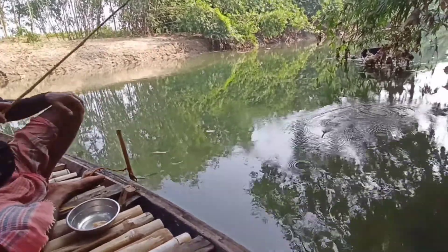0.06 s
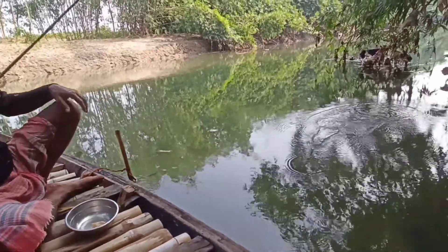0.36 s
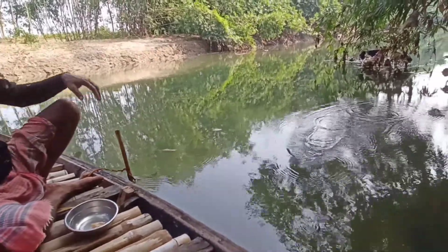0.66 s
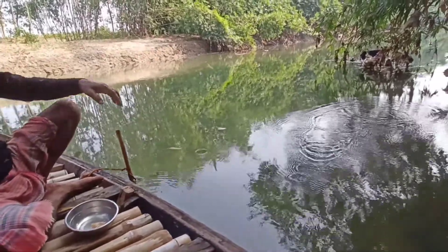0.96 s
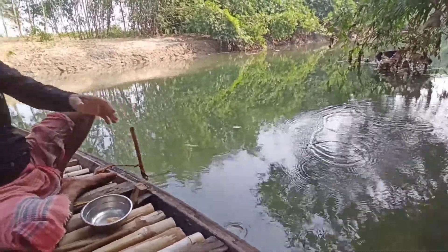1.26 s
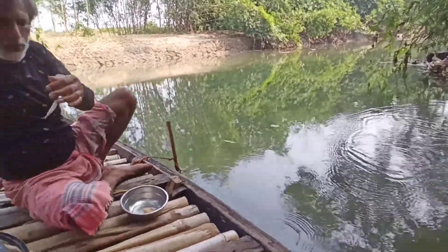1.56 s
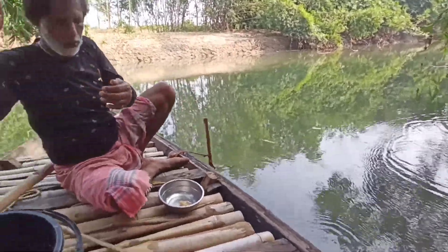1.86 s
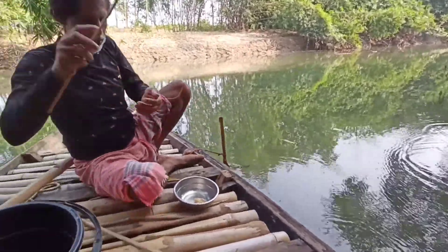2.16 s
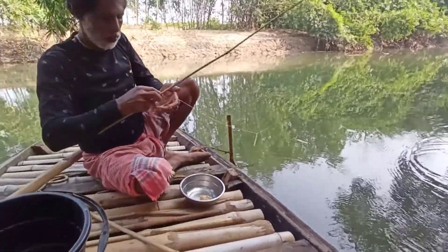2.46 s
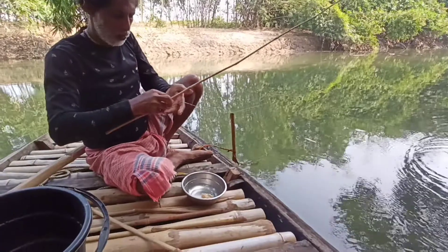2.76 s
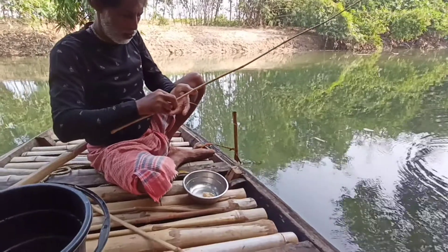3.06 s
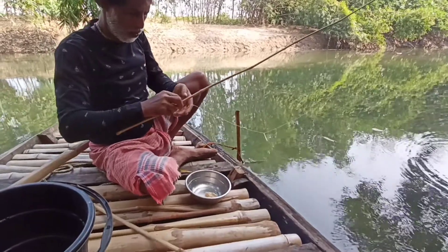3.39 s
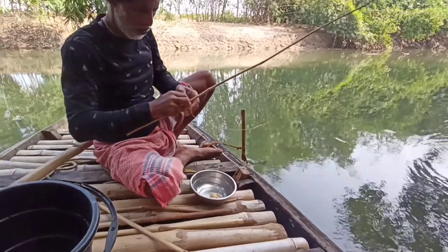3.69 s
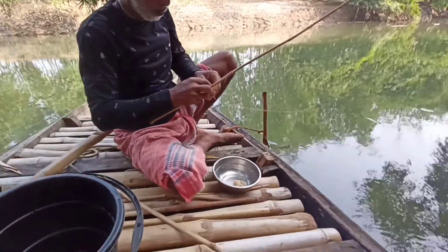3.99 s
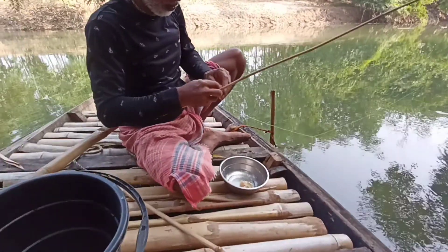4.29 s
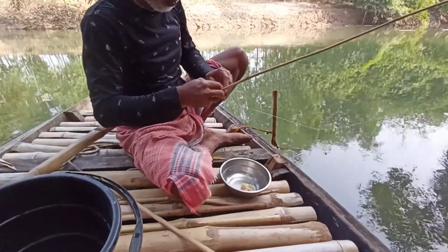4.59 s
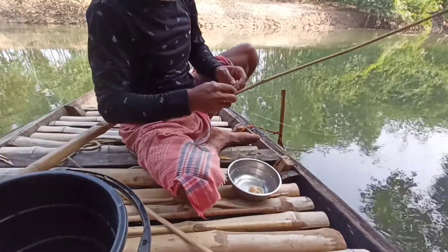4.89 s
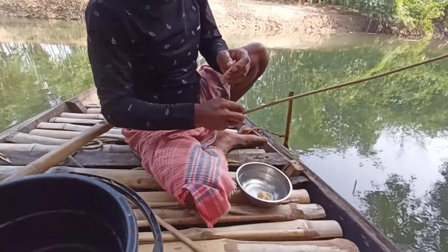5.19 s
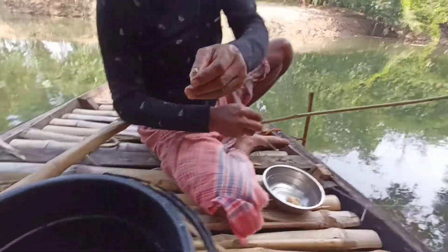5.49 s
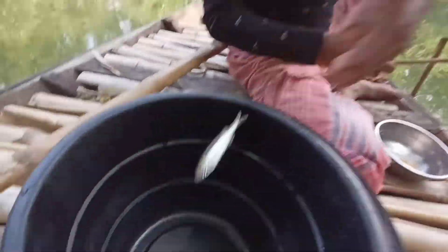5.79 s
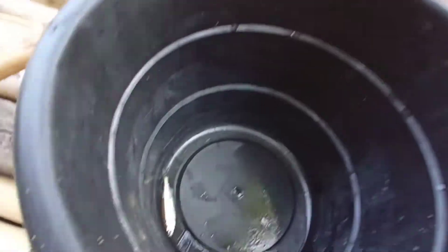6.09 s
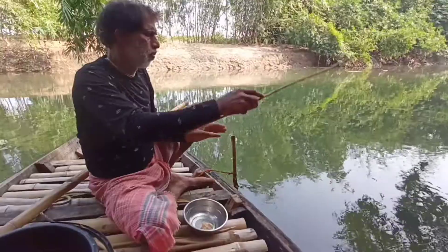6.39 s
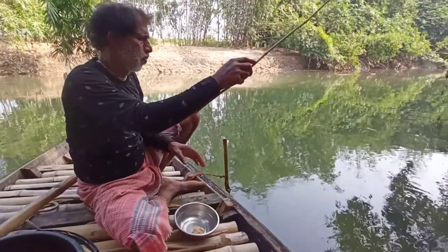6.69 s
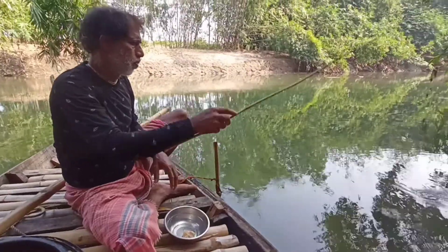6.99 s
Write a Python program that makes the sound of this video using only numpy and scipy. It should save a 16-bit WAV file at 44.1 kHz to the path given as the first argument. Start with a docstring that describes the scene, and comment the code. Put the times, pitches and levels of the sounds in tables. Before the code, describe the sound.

Faint birds chirp by a quiet river; a soft plop, then a small fish thuds and splashes into a plastic bucket.

```python
"""Faint open-air hiss and a low drone lie over a quiet river bank, heard from a bamboo-decked boat.
Small birds chip and whistle and a rooster crows far off: gliding tones that the wooded banks echo.
A small fish is pulled out with a soft plop of resonating bubbles; sleeves rustle by friction and
tackle ticks while it is unhooked. It is tossed into a nearby plastic bucket with a little water and
flaps there: each impact excites the bucket's damped modes, and drops patter down afterwards."""
import sys
import numpy as np
from scipy import signal
from scipy.fft import rfft, irfft
from scipy.io import wavfile

SR = 44100
rng = np.random.default_rng(int(sys.argv[2]) if len(sys.argv) > 2 else 0)


def unload_audio(sound):
    """Save the sound as a 16-bit wav file, at the path given as the first command line argument."""
    columns = np.transpose(np.atleast_2d(sound))
    # keep every value between -1 and 1, then stretch to whole-number steps
    steps = np.round(np.clip(columns, -1, 1) * 32767)
    wavfile.write(sys.argv[1], SR, steps.astype(np.int16))


N = 319705
TIME = np.arange(N) / SR


def gain_of(db):
    """Amplitude ratio of a level in decibels."""
    return 10 ** (np.asarray(db) / 20)


def unit_rms(x):
    """Normalisation to unit power."""
    return x / np.sqrt(np.mean(x ** 2) + 1e-20)


def value_at(points, hz):
    """Interpolation on a logarithmic frequency axis."""
    f, value = np.transpose(points)
    return np.interp(np.log(hz + 1), np.log(f + 1), value)


def add(mix, s, sound):
    """Superposition: a sound joins the mix at s seconds."""
    part = mix[max(round(s * SR), 0):][:len(sound)]
    part += sound[:len(part)]


def progress(length):
    """Normalised time, 0 to 1 over a length in seconds."""
    return np.arange(0, 1, 1 / (length * SR))


def coloured(x, points, size=4096):
    """Spectral shaping by a minimum-phase filter of unit energy."""
    db = value_at(points, abs(np.fft.fftfreq(size, 1 / SR)))
    log_gain = np.log(gain_of(np.maximum(db, -100)))
    response = np.exp(np.conj(signal.hilbert(log_gain)))
    taps = np.fft.ifft(response).real[:size // 2]
    return signal.oaconvolve(x, taps / np.linalg.norm(taps))[:len(x)]


def wander(rate_hz, size=N):
    """Random fluctuation of unit power: noise rolled off above the given rate."""
    lowpass = np.exp(-(np.fft.rfftfreq(size, 1 / SR) / rate_hz) ** 2)
    return unit_rms(irfft(rfft(rng.standard_normal(size)) * lowpass, size))


def grainy(spread_db, rate_hz):
    """Random amplitude modulation gathers noise into clumps."""
    return unit_rms(rng.standard_normal(N) * gain_of(spread_db * np.clip(wander(rate_hz), -2, 2)))


def surges(rows):
    """Envelopes of linear rise and exponential decay add in power, as incoherent sources do."""
    power, t = np.zeros(N), TIME[:SR]
    for s, db, rise, decay in rows:
        envelope = gain_of(db) * np.minimum(t / rise, 1) * np.exp(-np.maximum(t - rise, 0) / decay)
        add(power, s, envelope ** 2)
    return np.sqrt(power)


def sung(hz, rasp, rasp_hz, attack, release, shimmer_db, overtone_db=-40):
    """A tone with random frequency and amplitude modulation; attack and release are shares of it."""
    u = np.linspace(0, 1, len(hz))
    pitch = hz * (1 + rasp * wander(rasp_hz, size=SR)[:len(u)])
    phase = 2 * np.pi * np.cumsum(pitch) / SR
    ramp = np.clip(np.minimum(u / attack, (1 - u) / release), 0, 1)
    swell = np.sin(np.pi / 2 * ramp) ** 2
    shimmer = gain_of(shimmer_db * wander(21, size=SR)[:len(u)])
    overtones = gain_of(overtone_db) * (np.sin(2 * phase) + np.sin(3 * phase))
    return swell * shimmer * (np.sin(phase) + overtones)


def chip(top_hz, length, sweep, droop):
    """A parabolic frequency sweep shoots up to its top at halfway, then droops."""
    u = progress(length)
    arch = 1 - np.where(u < .5, sweep, droop) * (2 * u - 1) ** 2
    hz = top_hz * arch * (1 + 0.0057 * rng.standard_normal())
    return np.sin(np.pi * u) ** 0.23 * np.sin(2 * np.pi * np.cumsum(hz) / SR)


# Spectra of the hiss and the drone. Each row: frequency in Hz, relative level in dB.
HISS_SPECTRUM = [(25, -34), (43, -25), (190, 3), (344, -15.5), (695, -12), (936, -20.5), (1790, -19),
                 (2410, -24), (4870, -20.5), (6380, -25.5), (7510, -19), (10100, -34), (14800, -29),
                 (16000, -31)]
DRONE_SPECTRUM = [(25, -56), (55, -7), (110, -9), (150, -8), (182, 0.5), (225, -7), (300, -13), (500, -27),
                  (1200, -49)]

def air():
    """Ambient noise: a broadband hiss over a distant low drone whose level fluctuates."""
    hiss = gain_of(-66) * coloured(rng.standard_normal(N), HISS_SPECTRUM) * gain_of(0.087 * wander(15))
    drone = gain_of(-65) * coloured(rng.standard_normal(N), DRONE_SPECTRUM) * gain_of(wander(17))
    return hiss + drone


# Reverberation of the wooded banks. Each row: frequency in Hz, time to fall 60 dB (T60) in seconds.
BANK_DECAY = [(150, 1), (600, 0.85), (2500, 0.5), (5000, 1), (14000, 0.68)]

def bank_echo(x, build_s, treble_db):
    """Scattering from leaves and banks gives many reflections, each band decaying at its own rate."""
    reflections = rng.standard_normal(SR) * (rng.random(SR) < .06)
    reflections *= np.minimum(TIME[:SR] / build_s, 1) ** 2
    hz, t, bands = signal.stft(reflections, SR, nperseg=256)
    decay_db = -60 * t / value_at(BANK_DECAY, hz)[:, None]
    tilt_db = value_at([(300, 0), (4000, treble_db)], hz)[:, None]
    tail = signal.istft(bands * gain_of(decay_db + tilt_db), SR, nperseg=256)[1]
    return signal.oaconvolve(x, tail / np.linalg.norm(tail))[:N]


# Syllables of crowing. Each row: start and length in seconds, first, top and last pitch in Hz,
# place of the top from 0 to 1, level in dB, hoarseness as a share of pitch.
CROW_SYLLABLES = [(2.556, 0.61, 607, 734, 609, 0.23, -69.5, 0.041),
                  (3.443, 0.66, 604, 755, 597, 0.15, -70.5, 0.029),
                  (4.632, 0.13, 637, 812, 690, 0.8, -68, 0.013),
                  (4.874, 0.11, 655, 807, 667, .55, -69, 0.019),
                  (5.181, .48, 797, 845, 634, 0.3, -67.5, 0.0068),
                  (6.306, 0.081, 700, 780, 747, 0.57, -58.5, 0.042)]

def rooster():
    """Frequency jitter makes a hoarse voice; each syllable climbs, then sinks and weakens."""
    out = np.zeros(N)
    for s, length, start_hz, top_hz, end_hz, top, db, hoarse in CROW_SYLLABLES:
        u = progress(length)
        before, after = np.maximum(1 - u / top, 0), np.maximum((u - top) / (1 - top), 0)
        pitch = top_hz + (start_hz - top_hz) * before ** 2 + (end_hz - top_hz) * after ** 1.1
        voice = sung(pitch, hoarse, 90, attack=0.028, release=0.022, shimmer_db=1.2, overtone_db=-30)
        fade_db = -1.5 * np.maximum(u - top, 0)
        add(out, s, gain_of(db + fade_db) * voice)
    return out


# Assorted short bird notes, including high lead-ins to two "tsee" calls. Each row: start and length
# in seconds, first and last pitch in Hz, level in dB, rasp as a share of pitch.
SHORT_NOTES = [(0.0, 0.25, 611, 584, -73, 0.012), (1.378, 0.16, 5650, 5790, -71, 0.06),
               (2.328, 0.053, 2090, 2210, -69.5, 0.037), (3.585, 0.19, 4640, 4500, -68.5, 0.075),
               (3.865, 0.087, 505, 491, -67.5, .006), (4.067, 0.18, 8070, 7900, -69.5, 0.0065),
               (6.565, .035, 2000, 1990, -66, .012), (5.769, 0.073, 1750, 1716, -67, 0.016),
               (6.695, 0.056, 5900, 7750, -63, 0.14)]

def short_bird_notes():
    """Single notes, each a linear frequency glide."""
    out = np.zeros(N)
    for s, length, start_hz, end_hz, db, rasp in SHORT_NOTES:
        pitch = start_hz + (end_hz - start_hz) * progress(length)
        note = sung(pitch, rasp, rasp_hz=293, attack=0.15, release=0.18, shimmer_db=2.5)
        add(out, s, gain_of(db) * note)
    return out


# Long thin whistles. Each row: start and length in seconds, top pitch in Hz, level in dB,
# place of the top from 0 to 1.
THIN_WHISTLES = [(2.075, 0.39, 5310, -61, 0.77), (3.983, 0.54, 5365, -67, 0.52),
                 (5.84, 0.26, 5320, -66, 0.7), (7.116, 0.24, 5300, -63.5, 0.7)]

def thin_whistler():
    """Amplitude modulation flutters a fading tone whose pitch follows a shallow arch."""
    out = np.zeros(N)
    for s, length, top_hz, db, top in THIN_WHISTLES:
        u = progress(length)
        flutter_db = 2.5 * np.clip(wander(rate_hz=34.7, size=SR)[:len(u)], -2, 1)
        pitch = top_hz * (1 - 0.18 * (u - top) ** 2)
        note = sung(pitch, rasp=0.014, rasp_hz=150, attack=0.085, release=0.16, shimmer_db=1.9)
        add(out, s, gain_of(db - 9 * u + flutter_db) * note)
    return out


# Lower whistles, one contour a call. Each point: time in seconds, pitch in Hz, level in dB.
FLICK_CALLS = [
    [(4.262, 2210, -76), (4.3, 2480, -65), (4.345, 2450, -68), (4.372, 2506, -55), (4.395, 2500, -61),
     (4.418, 2498, -67), (4.432, 2100, -68)],
    [(4.635, 2410, -78), (4.675, 2480, -61.5), (4.717, 2518, -56), (4.729, 2526, -66), (4.737, 2550, -59),
     (4.762, 2540, -74), (4.776, 2530, -52), (4.787, 2120, -69)],
]

def flick_whistler():
    """A harmonic tone scoops up and swells; deep frequency jitter roughens its closing flick."""
    out = np.zeros(N)
    flick_s, flick_hz, flick_db = 0.029, 2710, -57
    for call in FLICK_CALLS:
        s, hz, db = np.transpose(call)
        t = np.arange(s[0], s[-1], 1 / SR)
        note = sung(np.interp(t, s, hz), rasp=0.0064, rasp_hz=250, attack=0.035, release=0.03,
                    shimmer_db=0.5, overtone_db=-13.5)
        add(out, s[0], gain_of(np.interp(t, s, db)) * note)
        fall = flick_hz * (1 - 0.154 * progress(flick_s))
        flick = sung(fall, rasp=0.16, rasp_hz=604, attack=0.14, release=0.64, shimmer_db=2)
        add(out, s[-1] - flick_s / 4, gain_of(flick_db) * flick)
    return out


# Very high "tsee" calls. Each row: start and length in seconds, held pitch in Hz, level in dB,
# rasp as a share of pitch.
TSEES = [(1.019, 0.059, 6860, -62, 0.041), (3.05, 0.063, 6970, -62.5, 0.011),
         (3.264, 0.093, 6750, -61, 0.0057), (4.203, 0.078, 7170, -60, 0.029),
         (6.74, 0.063, 7070, -59, 0.029), (7.138, 0.07, 7170, -61.5, .04)]

def tsee_bird(settle_s=0.019):
    """Exponential relaxation: the pitch drops onto a note and holds it."""
    out = np.zeros(N)
    for s, length, hz, db, rasp in TSEES:
        pitch = hz * (1 + 0.14 * np.exp(-length * progress(length) / settle_s))
        note = sung(pitch, rasp, rasp_hz=466, attack=0.28, release=0.14, shimmer_db=2.5)
        add(out, s, gain_of(db) * note)
    return out


# Two-part calls. Each row: start in seconds, level of the hook in dB, level of the slur in dB.
HOOK_CALLS = [(1.346, -68, -68), (2.03, -52.5, -70), (2.574, -58.5, -72), (3.284, -60, -69),
              (3.833, -60, -71), (4.582, -65, -74), (5.1798, -67, -63.5), (5.808, -64, -79),
              (6.34, -56.5, -67)]

def hook_bird(slur_hz=3300, slur_after_s=0.07):
    """Two frequency sweeps in turn: a steep rising hook, then a soft falling slur."""
    out = np.zeros(N)
    for s, db, slur_db in HOOK_CALLS:
        add(out, s, gain_of(db) * chip(top_hz=4710, length=0.0283, sweep=0.347, droop=0.036))
        fall = slur_hz * (1 - 0.185 * progress(length=0.04))
        slur = sung(fall, rasp=0.015, rasp_hz=280, attack=0.35, release=0.45, shimmer_db=1)
        add(out, s + slur_after_s, gain_of(slur_db) * slur)
    return out


# Chips, about two a second. Each row: start in seconds, direct level in dB, echo level in dB.
CHIPS = [(0.4414, -73, -72), (0.8374, -71, -80), (1.2, -69, -79), (1.3478, -65, -66),
         (2.1804, -64.5, -62.5), (2.6204, -65, -58.5), (3.0574, -62.5, -62), (3.4864, -58.5, -62),
         (3.8674, -61, -70), (4.2434, -60, -64), (4.3874, -60, -67), (4.7854, -61, -70),
         (5.3784, -62.5, -70), (6.5314, -67, -67), (6.9014, -69, -71)]

def chipping_bird():
    """Each upward sweep takes two paths: straight to the listener, and into the trees."""
    direct, to_trees = np.zeros((2, N))
    for s, db, echo_db in CHIPS:
        call = chip(top_hz=3506, length=0.0206, sweep=0.259, droop=0.068)
        add(direct, s, gain_of(db) * call)
        add(to_trees, s, gain_of(echo_db) * call)
    return direct, to_trees


def birds():
    """Direct and reverberant sound add, in a different ratio for each kind of call."""
    direct, to_trees = chipping_bird()
    hooks = hook_bird()
    whistles = thin_whistler() + flick_whistler() + short_bird_notes()
    for voice, echo_db in (hooks, -8.5), (whistles, -4.5), (tsee_bird(), -4), (rooster(), -7):
        direct += voice
        to_trees += gain_of(echo_db) * voice
    return direct + bank_echo(to_trees, build_s=0.01, treble_db=1)


# Strokes of cloth. Each row: centre and half-width in seconds, level in dB.
RUSTLES = [(1.822, 0.015, -67.5), (2.057, 0.049, -61.5), (2.33, 0.16, -66.5), (3.2, 0.089, -67),
           (3.844, 0.066, -65.5), (5.123, 0.93, -69.5), (6.026, 0.13, -58), (6.336, 0.15, -61.5),
           (7.052, 0.3, -67)]
# Spectrum of rubbing cloth. Each row: frequency in Hz, relative level in dB.
CLOTH_SPECTRUM = [(200, 5.5), (700, 6), (1500, -5.5), (2500, 0.5), (4800, 3.5), (6200, 1.5), (7700, 2.5),
                  (10000, -8), (14500, -5.5), (16000, -11)]

def sleeves():
    """Friction of cloth makes crackly noise that swells and fades with each stroke."""
    power = sum(gain_of(db) ** 2 * np.exp(-((TIME - s) / half) ** 2) for s, half, db in RUSTLES)
    return np.sqrt(power) * coloured(grainy(spread_db=2.5, rate_hz=120), CLOTH_SPECTRUM)


# Ticks of the tackle and knocks of the rod. Each row: start in seconds, relative level in dB.
TICKS = [(1.435, -44.5), (1.443, -51.5), (1.823, -48.5), (2.315, -52), (3.046, -48), (5.591, -53.5),
         (5.901, -46), (6.989, -50)]
KNOCKS = [(3.171, -52), (4.528, -49), (4.801, -49), (5.121, -50.5), (7.035, -51)]
# Their spectra. Each row: frequency in Hz, relative level in dB.
TICK_SPECTRUM = [(500, -4), (3000, -13), (5500, 3), (7800, 4), (10500, -6.5), (14500, 9), (16000, -6)]
KNOCK_SPECTRUM = [(150, -24), (400, -2), (720, 2), (1100, -1), (1800, -3), (3500, -11), (8000, -34),
                  (16000, -46)]

def tackle():
    """Small impacts radiate noise bursts: bright from line and hook, duller from the handled rod."""
    ticks = surges([(s, db - 0.5, .0003, .0012) for s, db in TICKS]) * rng.standard_normal(N)
    knocks = surges([(s, db - 10.5, .002, .008) for s, db in KNOCKS]) * rng.standard_normal(N)
    faint_ticks = (rng.random(N) < 7 / SR) * gain_of(-52 + 3.4 * rng.standard_normal(N))
    return coloured(ticks + faint_ticks, TICK_SPECTRUM) + coloured(knocks, KNOCK_SPECTRUM)


# Gulps of river water. Each row: start in seconds, level in dB, rise and decay in seconds.
GULPS = [(1.80, -55.5, 0.0024, 0.029), (1.91, -56, 0.011, 0.15), (1.972, -41.5, 0.016, 0.044),
         (2.16, -57, 0.009, 0.065)]
# Their spectrum. Each row: frequency in Hz, relative level in dB.
GULP_SPECTRUM = [(40, -50), (110, 2.5), (230, 3.5), (420, -8.5), (750, -12), (950, -25), (1250, -19),
                 (2200, -32), (6000, -44)]

def river_gulps():
    """Water displaced as the fish comes out gives surges of low-frequency noise."""
    return coloured(surges(GULPS) * grainy(spread_db=1.5, rate_hz=140), GULP_SPECTRUM)


# Air pockets in river and bucket. Each row: start in seconds, pitch in Hz, level in dB, T60 in seconds.
BUBBLES = [(1.9961, 245, -29.5, 0.05), (1.999, 454.6, -43, 0.17), (2.013, 189.7, -41.5, 0.27),
           (6.052, 1455, -23, 0.047), (6.089, 378, -15.5, 0.07), (6.096, 618, -29.5, 0.091),
           (6.072, 940, -24, 0.038), (6.113, 1047, -36, 0.067), (6.1776, 1373, -30.5, 0.026),
           (6.221, 3000, -47, 0.021), (6.2474, 3230, -45, 0.018)]

def bubbles(rise_per_t60=0.1):
    """Trapped air rings as a damped oscillator whose pitch rises as it dies."""
    out, t = np.zeros(N), TIME[:SR // 2]
    for s, hz, db, t60 in BUBBLES:
        cycles = hz * (t + rise_per_t60 * t ** 2 / (2 * t60))
        envelope = gain_of(db - 60 * t / t60) * (1 - np.exp(-2 * cycles))
        add(out, s, envelope * np.sin(2 * np.pi * cycles))
    return out


# Modes of plastic and enclosed air. Each row: frequency in Hz, relative level in dB, T60 in seconds.
BUCKET_MODES = [(181.6, -3.5, 0.19), (223, -5, 0.036), (300, -7, 0.03), (354, -10.5, 0.036),
                (469, -16, 0.052), (566, -20, 0.21), (632, -17, 0.07), (800, -19.5, 0.049), (997, -21, 0.1),
                (1253, -24, 0.091), (1505, -28, 0.09), (1610, -17.5, 0.053), (1914, -7, 0.015),
                (2730, -8, 0.011)]

def bucket_ring():
    """The bucket's impulse response is a sum of damped modes."""
    t = TIME[:SR // 2]
    return sum(gain_of(db - 60 * t / t60) * np.sin(2 * np.pi * hz * t) for hz, db, t60 in BUCKET_MODES)


# Rocking water. Each row: start in seconds, level in dB, rise and decay in seconds.
SLOSH = [(6.2, -51.5, 0.055, 0.21)]
# Spectrum of wet impacts. Each row: frequency in Hz, relative level in dB.
WET_SPECTRUM = [(600, -30.5), (1500, 4), (2600, -7), (3600, -2.5), (5000, 0.5), (6000, -12), (7500, -1),
                (10000, -19.5), (14500, -6), (16000, -3.5)]

def settling_water(start_s=6.19, drips_per_s=49, decay_s=0.28):
    """Drips patter at random and die away, while sloshing drives the bucket into forced vibration."""
    since, t = TIME - start_s, TIME[:SR // 2]
    arrivals = (since > 0) * (rng.random(N) < drips_per_s / SR)
    drips = arrivals * gain_of(-46 + 4.2 * rng.standard_normal(N)) * np.exp(-abs(since) / decay_s)
    splat = rng.standard_normal(len(t)) * np.exp(-t / 0.00073)
    patter = signal.oaconvolve(drips, splat)[:N]
    ring = bucket_ring()
    hum = signal.oaconvolve(surges(SLOSH) * rng.standard_normal(N), ring / np.linalg.norm(ring))[:N]
    return coloured(patter, WET_SPECTRUM) + hum


# Spray and churned water. Each row: start in seconds, level in dB, rise and decay in seconds.
SPRAY = [(6.033, -35.5, 0.017, 0.038), (6.18, -74, 0.0091, 0.16)]
CHURN = [(6.047, -20.5, 0.0043, 0.031), (6.083, -24.5, 0.0044, 0.01)]
# Spectrum of churning water, with a low thump of the deck. Each row: frequency in Hz, level in dB.
CHURN_AND_DECK_SPECTRUM = [(30, -45), (65, 0), (130, -22), (260, 1), (420, 5.5), (730, -8.5), (1000, -3.5),
                           (1650, -12.5), (2600, -20.5), (5000, -33.5)]
# Single drops. Each row: start in seconds, level in dB.
DROPS = [(6.0445, -34), (6.0578, -22), (6.06, -27), (6.093, -36), (6.101, -33), (6.1124, -37), (6.129, -38),
         (6.158, -38), (6.1725, -33), (6.177, -20.5), (6.2035, -43), (6.2475, -47), (6.2614, -41),
         (6.266, -39), (6.298, -48)]

def bucket_splash():
    """Turbulent water and a thump of the deck give low noise; spray and drops give bright bursts."""
    spray = coloured(surges(SPRAY) * grainy(spread_db=-3.5, rate_hz=2800), WET_SPECTRUM)
    churn = surges(CHURN) * grainy(spread_db=-3.5, rate_hz=83)
    drops = surges([(s, db, .0002, .00045) for s, db in DROPS]) * rng.standard_normal(N)
    return spray + coloured(churn, CHURN_AND_DECK_SPECTRUM) + coloured(drops, TICK_SPECTRUM)


# Blows of the fish on the bucket. Each row: start in seconds, impulse level in dB,
# contact time in seconds, level of the wet slap in dB.
BLOWS = [(6.0327, -9, 0.0004, -31), (6.0538, -14.5, 0.001, -25), (6.057, -18.5, 0.00019, -18),
         (6.06, -27, 0.00041, -29.5), (6.0741, -21, 0.00052, -44), (6.0804, -28, 0.0007, -21),
         (6.1774, -28.5, 0.00093, -37)]

def flapping_fish():
    """Impact excitation: the soft, wet body slaps and rings the bucket; longer contact is duller."""
    thuds, t = np.zeros(N), TIME[:SR // 2]
    ring = bucket_ring()
    for s, db, contact, _ in BLOWS:
        force = t * np.exp(-4 * t / contact)
        add(thuds, s, gain_of(db) * signal.oaconvolve(ring, force / force.sum())[:len(t)])
    cutoff_hz = 172  # the thuds carry little sound below this frequency
    thuds = signal.sosfilt(signal.butter(3, cutoff_hz, "high", fs=SR, output="sos"), thuds)
    slaps = surges([(s, db, .0005, .0024) for s, _, _, db in BLOWS]) * rng.standard_normal(N)
    return thuds + coloured(slaps, WET_SPECTRUM)


def scene():
    """All sources superpose, and the banks faintly reflect those near the boat."""
    near = flapping_fish() + bucket_splash() + settling_water()
    near += river_gulps() + bubbles() + sleeves() + tackle()
    echo = gain_of(-17.5) * bank_echo(near, build_s=0.025, treble_db=18.5)
    return (near + echo + birds() + air())[None]


def record(dry):
    """Band limiting: a linear-phase low-pass filter removes the highest treble."""
    lowpass = signal.firwin(511, cutoff=15750, window=("kaiser", 9), fs=SR)
    return signal.oaconvolve(dry, lowpass[None], "same")


dry = scene()
out = record(dry)
unload_audio(out)
```